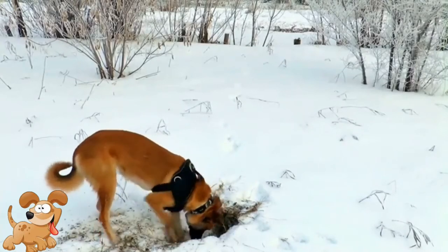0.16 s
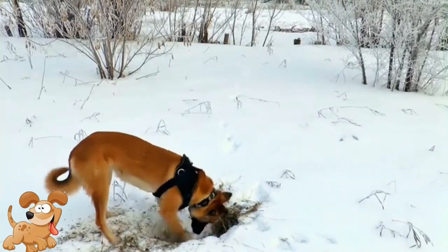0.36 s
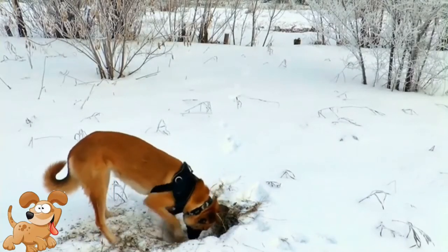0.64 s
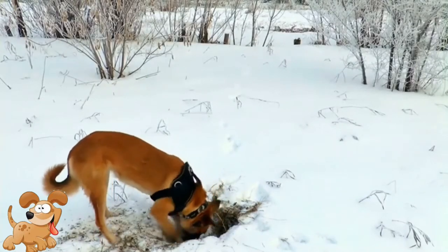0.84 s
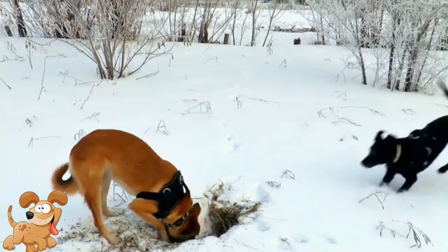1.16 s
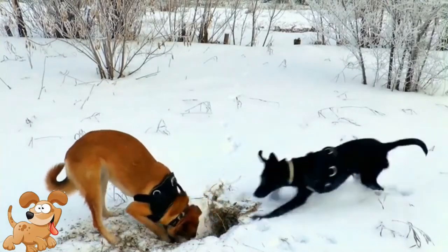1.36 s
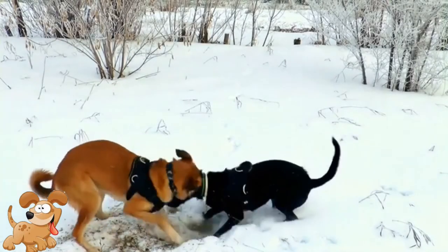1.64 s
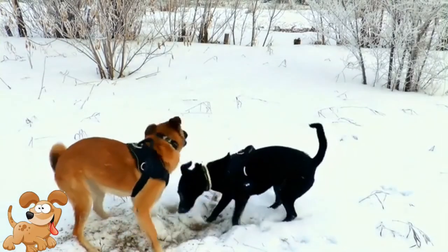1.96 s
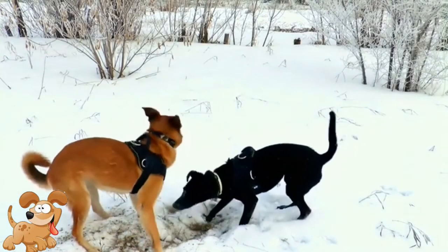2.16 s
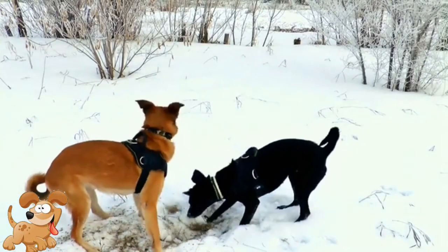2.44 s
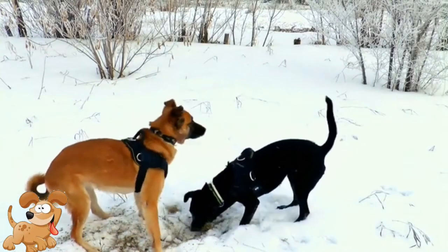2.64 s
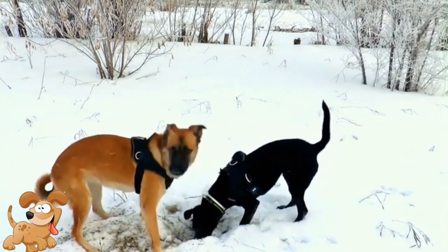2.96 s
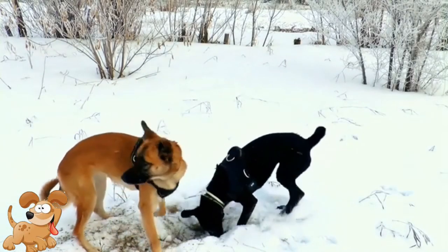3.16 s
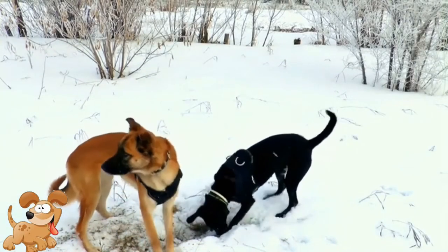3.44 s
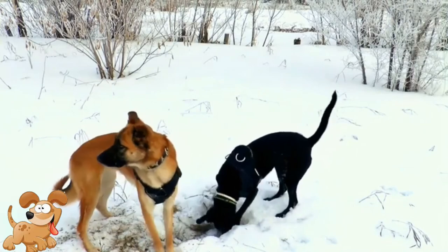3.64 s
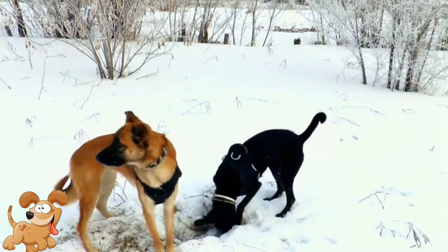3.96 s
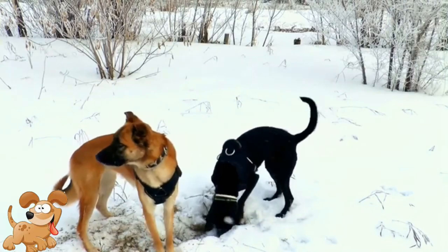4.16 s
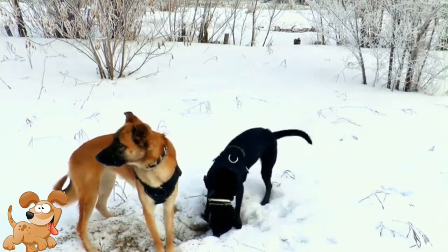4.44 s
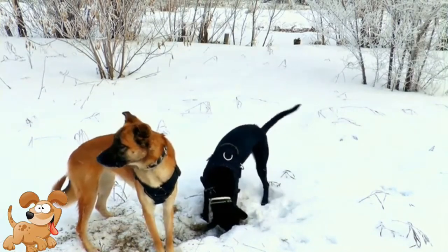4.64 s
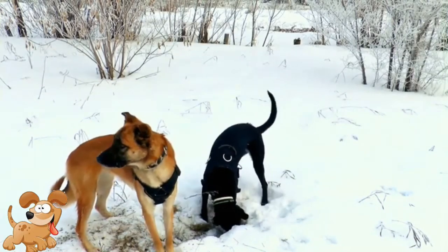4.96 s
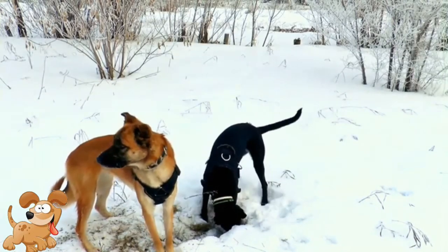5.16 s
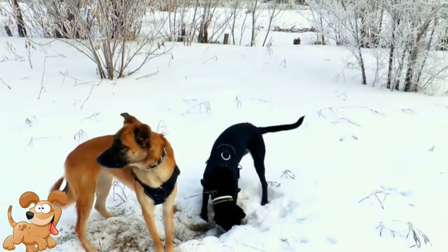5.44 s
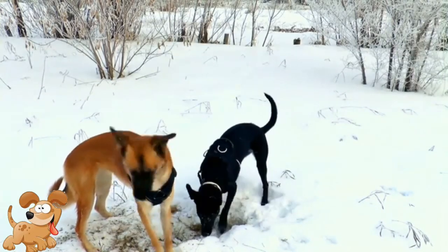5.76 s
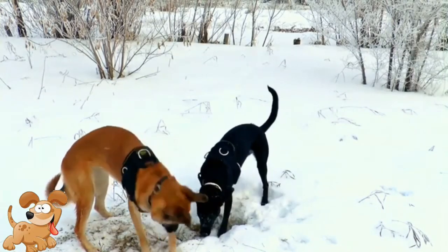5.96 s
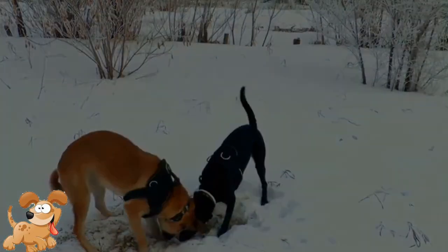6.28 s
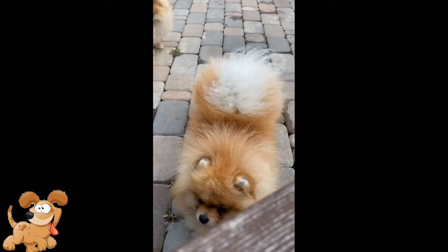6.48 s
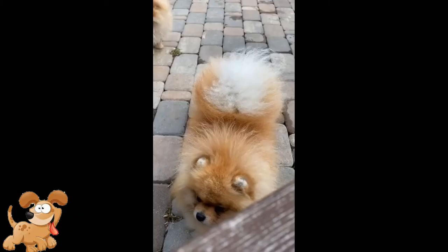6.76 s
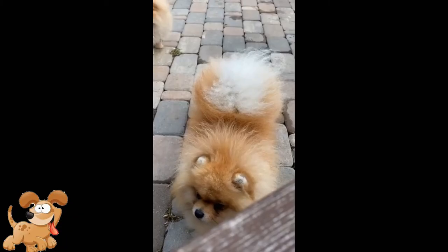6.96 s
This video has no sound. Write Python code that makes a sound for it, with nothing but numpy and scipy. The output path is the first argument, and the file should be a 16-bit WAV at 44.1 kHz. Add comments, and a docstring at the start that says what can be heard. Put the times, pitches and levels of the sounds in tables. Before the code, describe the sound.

Paws rake crunchy frozen snow in quick irregular bursts with snaps and knocks, then a dog snorts; silence, then faint claw clicks on paving.

```python
"""Paws rake crusted snow, knock on frozen soil and snap stalks as two dogs dig; soft pips, then one dog snorts.
A low outdoor rumble and thin hiss lie beneath. This fades, falls silent and cuts to a quiet paved yard
where a small dog's claws click over a hush and a soft rustle.
Raking is coloured random grains under force curves; snaps, knocks, flaps and claws are struck decaying modes;
air, hush and rustle are coloured noise; pips are swelling sines; the nose rasp is noise on gliding carriers."""
import sys
import numpy as np
from scipy import signal
from scipy.fft import rfft, irfft, next_fast_len
from scipy.io import wavfile
from scipy.ndimage import map_coordinates

SR = 44100
rng = np.random.default_rng(int(sys.argv[2]) if len(sys.argv) > 2 else 0)


def materialize(psi):
    """Save the field psi as 16-bit PCM at rate SR to the path in sys.argv[1].

    A 1-D psi becomes a single channel; in a 2-D psi each row is a channel.
    """
    bounded = np.clip(np.atleast_2d(psi).T, -1, 1)
    quanta = np.round(bounded * 32767).astype(np.int16)
    wavfile.write(sys.argv[1], SR, quanta)


N = 313551
TIME_S = np.arange(N) / SR
BIN_HZ = np.maximum(np.fft.rfftfreq(next_fast_len(N), 1 / SR), 1)
HIT_SAMPLES = SR // 6
SNOW_END_S, YARD_START_S = 6.453, 6.593
CUTOFF_HZ = 15800

# Spectra here and below: relative levels. Outdoor rumble. Each row: frequency in Hz, density in dB per Hz.
AIR_SPECTRUM = [(25, -19), (55, -1.5), (110, -4.5), (240, 2), (400, -4), (560, -13), (740, -11.5),
                (1000, -29), (1600, -28), (2600, -31.5), (3500, -37.5), (7000, -42), (15000, -44.5)]
# Outdoor stereo balance. Each row: frequency in Hz, left minus right in dB.
AIR_BALANCE_DB = [(60, 0.5), (110, -2.5), (200, -3.5), (380, -9.5), (700, -12), (1290, -11.5), (2380, -28),
                  (4400, -24), (8100, -3.5), (15000, -51.5)]
# Outdoor left-right likeness. Each row: frequency in Hz, likeness (1 = identical).
AIR_LIKENESS = [(60, 0.86), (130, 0.6), (290, 0.39), (640, 0.28), (1400, 0.1), (7000, 0.2)]
# Rumble level. Each row: time in seconds, level in dB.
AIR_LEVEL_DB = [(0, -37), (1.5, -38), (2.7, -37), (4.2, -37), (5.5, -38), (6.05, -38.5), (6.25, -42.5),
                (6.45, -54.5)]
# Thin hiss. Each row: frequency in Hz, density in dB per Hz.
HISS_SPECTRUM = [(1300, -18.5), (1650, -6), (1920, 2.5), (2250, -5.5), (2700, -1.5), (2950, -11),
                 (3150, -6), (3400, -16.5), (5000, -32.5)]
# Hiss swelling and fading. Each row: time in seconds, level in dB.
HISS_LEVEL_DB = [(0, -50), (1.1, -44.5), (2.4, -47), (2.85, -49.5), (4.1, -62.5), (4.55, -51), (5.2, -54),
                 (5.5, -69), (6.45, -66.5)]

# Snow crust. Each row: frequency in Hz, density in dB per Hz.
CRUST_SPECTRUM = [(700, -16), (1250, -17), (1600, -9.5), (1950, -1.5), (2400, 0), (2850, -1), (3170, -2.5),
                  (3700, -3), (4350, -7), (5500, -10.5), (8000, -26.5), (15000, -48)]
# Ice spray. Each row: frequency in Hz, density in dB per Hz.
ICE_SPECTRUM = [(2000, -12), (4000, 3), (5500, 0), (7200, 2), (8500, 1), (9700, 2), (11500, -4),
                (14300, -12.5), (16000, -41.5)]
# Packed snow. Each row: frequency in Hz, density in dB per Hz.
SOIL_SPECTRUM = [(70, -6), (150, -3), (380, 1.5), (560, -1.5), (800, -3), (1200, -2), (1450, 0), (2200, -8),
                 (4000, -45.5)]
# Stereo balance of the dig. Each row: frequency in Hz, left minus right in dB.
DIG_BALANCE_DB = [(60, 10), (110, 9), (200, -6.5), (380, -17.5), (700, -10), (1290, -6.5), (2380, -5.5),
                  (4400, -8), (9500, -2), (13000, -25)]
# Left-right likeness of the dig. Each row: frequency in Hz, likeness (1 = identical).
DIG_LIKENESS = [(100, 1), (500, 0.34), (1400, 0.87), (3100, 0.7), (7000, 0.63), (15000, 0.93)]
# Paw strokes. Each row: start in seconds, hardest push in seconds after start, length in seconds,
# force at that push in dB, iciness (spray over crunch) in dB.
STROKES = [(0.0, 0.0071, 0.064, -34, -5), (0.195, 0.022, 0.088, -34, 1.5), (0.397, .018, 0.015, -32.5, -5),
           (.44, 0.044, 0.086, -41.5, 4), (0.552, 0.053, 0.074, -28, 1), (0.677, 0.044, 0.051, -32.5, 13),
           (0.746, 0.036, 0.039, -28.5, 5), (0.806, 0.014, 0.026, -30.5, 1.5),
           (0.846, 0.047, 0.057, -27, 5.5), (0.924, 0.018, 0.038, -32.5, 5),
           (0.978, .015, 0.024, -36.5, 14.5), (1.168, 0.03, 0.079, -19.5, -4.5),
           (1.269, 0.011, 0.024, -19, 0), (1.301, 0.03, 0.053, -23.5, -4), (1.419, .005, 0.02, -26.5, 7),
           (1.45, 0.026, 0.048, -20.5, -4), (1.514, 0.037, 0.045, -24.5, 3),
           (1.568, 0.014, 0.042, -23.5, 1.5), (1.736, 0.017, 0.042, -29, 4.5),
           (1.787, .022, 0.029, -35, -7), (1.86, .015, 0.033, -66, -8), (1.972, 0.046, 0.085, -33.5, -3),
           (2.071, .014, 0.028, -32.5, -6), (2.176, .015, 0.026, -34.5, 2), (2.203, .016, 0.02, -28.5, 0),
           (2.964, .006, 0.012, -46, -16), (2.995, .006, .014, -49, -11), (3.036, 0.018, 0.023, -39, -10),
           (3.072, .005, .012, -42, 0), (3.154, .018, 0.036, -44, -11), (3.247, 0.034, 0.052, -30.5, 2.5),
           (3.306, 0.047, 0.1, -40, -9), (3.416, .012, 0.024, -40, 6), (3.452, 0.055, 0.081, -31, 1),
           (3.539, 0.025, 0.05, -40.5, -3), (3.671, .025, 0.032, -44.5, -15),
           (3.923, .008, 0.014, -51, -11), (3.99, .012, 0.036, -52, -7),
           (4.151, 0.0092, 0.0081, -36.5, -6.5), (4.252, 0.057, 0.058, -42, -1),
           (4.317, 0.018, 0.033, -39, -8), (4.385, 0.023, 0.023, -32.5, 2.5), (4.432, .008, 0.012, -27, -2),
           (4.594, 0.05, 0.088, -41.5, -5), (4.735, 0.014, 0.082, -55, -16),
           (4.865, 0.06, 0.074, -40.5, -3), (5.59, .006, 0.034, -31.5, -7.5),
           (5.618, 0.045, 0.081, -28, -10), (5.779, .025, 0.054, -39.5, -11),
           (5.851, .02, 0.052, -40.5, -7), (5.919, 0.0085, 0.043, -32.5, 11),
           (5.967, 0.037, 0.072, -44, -17), (6.059, .01, 0.011, -36, -8), (6.234, 0.019, 0.036, -44, -6),
           (6.294, 0.019, 0.1, -44.5, -4.5)]
# Snow crumbling between strokes. Each row: time in seconds, force in dB.
CRUMBLING_FORCE_DB = [(0.0, -42), (0.33, -40.5), (0.9, -42.5), (1.08, -47.5), (1.16, -39.5), (1.25, -39),
                      (1.38, -34.5), (1.55, -32), (1.65, -34), (1.8, -41.5), (1.93, -35.5), (2.13, -39.5),
                      (2.27, -46.5), (2.42, -53.5), (2.85, -55.5), (3.6, -43), (4.05, -55), (4.45, -47.5),
                      (4.55, -58), (4.7, -48), (5.05, -60), (5.55, -56), (5.75, -41.5), (5.9, -45.5),
                      (6.15, -46.5), (6.45, -61.5)]
CRUMBLING_ICINESS_DB, CRUMBLING_WAVER_DB, CRUMBLING_WAVER_HZ = -1.5, 2, 31
PRESS_DB_PER_S, EASE_DB_PER_S = 128, 85
CATCH_DB, CATCH_HZ = .6, 45  # claws catch and slip: all layers jerk together
CRACKLE_DB, CRACKLE_DB_PER_CRUNCH_DB = -21.5, 0.88
SOIL_DB, SOIL_DB_PER_FORCE_DB, SOIL_DB_PER_ICINESS_DB = -13, 0.98, -0.37

# Stalks and ice snapping. Each row: time in seconds, level in dB, pitch factor, brightness tilt in dB per octave.
SNAPS = [(.094, -25, 0.78, -7), (.1856, -23, 0.63, -2.5), (.2596, -7, 0.936, 0), (.378, -25, .74, -1),
         (.5403, -23, 0.76, -2), (.5993, -4, 0.98, 7.5), (.6022, -11, 0.85, -4), (.9121, -6, 0.99, -1),
         (1.1286, -25, 0.3, 1), (1.4272, -17.5, 0.67, 1), (1.8595, -37, .9, -2), (2.3143, -24, 0.84, -6),
         (2.975, -33, 0.88, -6), (3.08, -36, 0.9, 0), (3.2567, -25, 1.44, 0), (3.8529, -31, 1.05, -7),
         (3.9366, -37, 0.71, -4), (4.4386, -24, 0.58, -3), (4.7901, -29, 2.5, -1)]
# Stalk modes before pitch and tilt. Each row: frequency in Hz, relative level in dB, 60 dB decay in seconds.
STALK_MODES = [(2280, -5.5, 0.007), (2950, -1.5, 0.003), (3680, -0.5, 0.0075), (4280, -1.5, 0.0035),
               (7300, -6, 0.0036), (10170, -2, 0.0024)]
SPLINTERS_PER_S, SPLINTER_OVER_CRUMBLING_DB = 6.6, 14
SPLINTER_SPREAD_DB, SPLINTER_SPREAD_OCTAVES = 1.5, .4

# Paws on frozen soil. Each row: time in seconds, level in dB, pitch in Hz.
KNOCKS = [(0.5402, -19.5, 715), (0.553, -20.5, 527), (.5565, -26, 920), (0.735, -23, 620),
          (0.7417, -24, 418), (0.8272, -21, 553), (0.832, -31, 430), (1.1269, -27.5, 760),
          (1.198, -21.5, 378), (1.208, -11, 724), (1.215, -13.5, 376), (1.222, -18.5, 890),
          (1.232, -14.5, 437), (1.252, -19.5, 674), (1.318, -20.5, 533), (1.428, -21.5, 780),
          (1.6248, -19.5, 750), (1.858, -25, 560), (1.903, -39, 480), (1.921, -23, 560), (1.965, -23, 397),
          (2.024, -28, 250), (2.079, -25.5, 292)]
# Frozen clod modes. Each row: multiple of its pitch, relative level in dB, share of its ring time.
CLOD_MODES = [(.48, -5, 0.67), (1, -3.5, 1), (1.55, -9, .8), (2.8, -11, 0.64), (4.6, -17.5, .6)]
KNOCK_CYCLES = 7  # cycles for a full-share mode to lose 60 dB

# Pips as the dogs jostle nose to nose. Each row: time in seconds, level in dB, pitch in Hz, swell in seconds.
PIPS = [(1.8695, -27.5, 1990, 0.0024), (1.921, -30, 705, 0.002), (1.964, -24.5, 680, .0025),
        (1.964, -32, 1980, .002), (1.9765, -27.5, 690, 0.0052), (1.98, -42, 1080, .003)]

# Nostrils flapping open. Each row: time in seconds, thump in dB, nasal ring in dB (before a common trim),
# pitch factor of the ring, puff of air in dB.
FLAPS = [(5.6354, -8, -28, 0.83, -34), (5.6425, -18, -33.5, 0.65, -39), (5.6549, -9, -9.5, 0.9, -26.5),
         (5.6792, -8.5, -8.5, .97, -26), (5.7092, -19, -7.5, 0.99, -34)]
# Chest modes before pitch. Each row: frequency in Hz, relative level in dB, 60 dB decay in seconds.
CHEST_MODES = [(128.7, -6, 0.052), (308, 6, 0.01), (467, 1.5, 0.023)]
# Muzzle modes before pitch. Each row: frequency in Hz, relative level in dB, 60 dB decay in seconds.
MUZZLE_MODES = [(620, -4.5, 0.006), (913, 1.5, 0.013), (1080, -8, 0.018), (1500, -12.5, 0.0083),
                (2130, -8.5, 0.017), (4020, -7.5, 0.0093)]
# Puffs. Each row: frequency in Hz, density in dB per Hz.
PUFF_SPECTRUM = [(300, 0.5), (1000, -4.5), (1700, -6), (2600, -19), (4500, -2), (9000, -10), (14000, -36.5)]
PUFF_FALL_S = 0.0044
# Rushing air, before a trim. Each row: time in seconds, level in dB.
SNORT_AIR_DB = [(5.62, -49), (5.654, -40), (5.665, -37), (5.6685, -20.5), (5.677, -28.5), (5.686, -29),
                (5.692, -15), (5.697, -27.5), (5.706, -30), (5.725, -36.5), (5.745, -51)]
# Rushing air. Each row: frequency in Hz, density in dB per Hz.
NOSTRIL_SPECTRUM = [(500, -1), (950, 6.5), (1400, 11), (1700, 5), (2300, 13.5), (2750, 11), (3200, -20),
                    (4200, 5), (6000, -37)]
# Resonance of the narrowing nose. Each row: time in seconds, frequency in Hz, level in dB.
NOSE_GLIDE = [(5.678, 880, -38), (5.684, 964, -27), (5.692, 1170, -26.5), (5.697, 1290, -30.5),
              (5.706, 1280, -46.5)]
NOSE_WIDTH_HZ, NOSE_UPPER_RATIO, NOSE_UPPER_DB = 180, 1.9, -0.5

# Yard hush. Each row: frequency in Hz, density in dB per Hz.
YARD_SPECTRUM = [(25, -19.5), (80, -7), (160, -18), (350, -22), (700, -25.5), (1300, -36), (1900, -47),
                 (3000, -58.5), (6000, -58), (10000, -78)]
# Left-right likeness of the yard. Each row: frequency in Hz, likeness (1 = identical).
YARD_LIKENESS = [(60, 0.93), (290, 0.86), (640, 0.56), (1400, 0.067), (3000, 0.11)]
# Stereo balance of the yard. Each row: frequency in Hz, left minus right in dB.
YARD_BALANCE_DB = [(100, -1.2), (1000, -1.4)]
# Soft rustle swelling between the claw ticks. Each row: time in seconds, level in dB.
RUSTLE_LEVEL_DB = [(6.6, -76), (6.64, -69), (6.69, -63), (6.75, -60.5), (6.81, -66), (6.85, -68),
                   (6.89, -79), (6.94, -59.5), (6.99, -71), (7.04, -63), (7.11, -76)]
# Rustle. Each row: frequency in Hz, density in dB per Hz.
RUSTLE_SPECTRUM = [(600, -5.5), (1100, 4), (1500, 5), (2000, -3), (2600, -11), (3200, -8), (4000, -22),
                   (6300, -29), (8000, -33)]
# Claws on paving. Each row: time in seconds, level in dB (before a common trim), pitch factor.
CLAWS = [(6.669, -63.5, 1.14), (6.7, -49.5, 0.97), (6.743, -52, 1.2), (6.784, -26, 1.01), (6.904, -59, 1.4),
         (6.93, -57, 0.74), (6.9478, -30.5, 1), (6.951, -41, 0.94), (6.961, -49, 1.2), (7.015, -49, 1),
         (7.032, -22, 1.023), (7.039, -38, 1.1), (7.052, -41, 1.07)]
# Claw modes before pitch. Each row: frequency in Hz, relative level in dB, 60 dB decay in seconds.
CLAW_MODES = [(374, -14.5, 0.035), (840, -6, 0.019), (1110, -4.5, 0.012), (1330, -9.5, 0.012),
              (2120, -4, 0.035), (2475, 0.5, 0.014), (3150, -8, 0.0049), (4000, -9.5, 0.0034),
              (6150, -6.5, 0.0072), (12600, -28, 0.0067)]


def from_db(db):
    """Decibels to gain."""
    return 10 ** (np.asarray(db) / 20)


def rms_one(x):
    """Scale to an rms of 1."""
    return x / np.sqrt(np.mean(x ** 2) + 1e-20)


def peak_one(x):
    """Scale to a peak of 1."""
    return x / (np.abs(x).max() + 1e-20)


def gain_curve(rows):
    """Rows of (s, dB) as a gain in time, silent outside them."""
    s, db = np.transpose(rows)
    return from_db(np.interp(TIME_S, s, db)) * (TIME_S >= s[0]) * (TIME_S <= s[-1])


def over_hz(points):
    """Points joined on a log-frequency axis."""
    hz, value = np.transpose(points)
    return np.interp(np.log(BIN_HZ), np.log(hz), value)


def pan(left_minus_right_db):
    """Left and right gains for a level difference; their mean is 1."""
    gains = from_db(np.array([[.5], [-.5]]) * left_minus_right_db)
    return gains / gains.mean(axis=0)


def drift(rate_hz):
    """Lowpassed noise with an rms of 1."""
    spectrum = rfft(rng.standard_normal(next_fast_len(N)))
    return rms_one(irfft(spectrum / (1 + (BIN_HZ / rate_hz) ** 2))[:N])


def white():
    """Two unrelated noises."""
    return rng.standard_normal((2, N))


def colour(pair, spectrum, likeness, balance_db):
    """Two unrelated excitations become one stereo sound with a given spectrum; mid level 1."""
    mid, side = rfft(pair, next_fast_len(N))
    alike = np.clip(over_hz(likeness), -1, 1)
    both = np.sqrt(1 + alike) * mid + np.sqrt(1 - alike) * side * [[1], [-1]]
    shaped = both * from_db(over_hz(spectrum)) * pan(over_hz(balance_db))
    out = irfft(shaped)[:, :N]
    return out / np.std(out.mean(axis=0))


def shifting(sound, ripple_db, width_hz, patch_s):
    """Broad random resonances change over time, partly shared by the two sides."""
    hz, s, frames = signal.stft(sound, SR, nperseg=512)
    shared, left, right = rng.standard_normal((3, 150, 60))
    grid = np.meshgrid(hz / width_hz, s / patch_s, indexing="ij")
    ripple = np.array([map_coordinates(shared + own / 2, grid, order=1, mode="wrap")
                       for own in (left, right)])
    return signal.istft(frames * rms_one(from_db(ripple_db * ripple)), SR)[1][:, :sound.shape[1]]


def strike(modes, pitch, grit, grit_s):
    """Modes rung by an impulse plus a decaying noise tail, as a contact crumbles after landing."""
    t = TIME_S[:HIT_SAMPLES]
    force = grit * rng.standard_normal(len(t)) * np.exp(-t / grit_s)
    force[0] = 1
    ring = np.zeros(len(t))
    for k, (hz, db, t60) in enumerate(modes):
        mode = from_db(db - 60 * t / t60) * np.sin(2 * np.pi * min(hz * pitch, CUTOFF_HZ) * t)
        ring += (-1) ** k * mode
    return signal.fftconvolve(force, ring)[:len(t)]


def place(hits):
    """Lay (s, dB, sound) hits on the time line."""
    out = np.zeros(N + SR)
    for s, db, sound in hits:
        at = int(s * SR)
        out[at:at + len(sound)] += from_db(db) * sound
    return out[:N]


def open_air():
    """A gently wavering noise rumble, with a thin, restless hiss on the right."""
    waver = from_db(1.54 * drift(9.5))
    rumble = gain_curve(AIR_LEVEL_DB) * colour(white(), AIR_SPECTRUM, AIR_LIKENESS, AIR_BALANCE_DB) * waver
    hiss = colour(white(), HISS_SPECTRUM, AIR_LIKENESS, AIR_BALANCE_DB)
    hiss = shifting(hiss, ripple_db=4.0, width_hz=210, patch_s=0.08)
    return rumble + gain_curve(HISS_LEVEL_DB) * hiss


def grains(per_s, spread_db, clump_db, clump_hz):
    """Tiny fractures of uneven size, their level wavering in clumps as the claws catch and slip."""
    born = rng.random(N) < per_s / SR
    sizes = from_db(spread_db * np.minimum(rng.exponential(1, N), 4))
    return white() * born * sizes * from_db(clump_db * drift(clump_hz))


def pressure(t, push_s, length_s, rise_s, fall_s):
    """A paw bites in, bears down to its hardest push, eases as it draws back, and trails off in crumbs."""
    bite = .5 + .5 * np.tanh(t / rise_s - .5)
    crumbs = np.exp(-np.maximum(t - length_s, 0) / fall_s)
    push_db = np.minimum(PRESS_DB_PER_S * (t - push_s), EASE_DB_PER_S * (push_s - t))
    return bite * crumbs * from_db(push_db)


def debris(layers, force_db, iciness_db):
    """Force raises crunch, crackle, spray and soil together; icy ground trades crunch and soil for spray."""
    crunch, crackle, ice, soil = layers
    crunch_db = force_db - iciness_db / 2
    crackle_db = CRACKLE_DB + CRACKLE_DB_PER_CRUNCH_DB * crunch_db
    ice_db = force_db + iciness_db / 2
    soil_db = SOIL_DB + SOIL_DB_PER_FORCE_DB * force_db + SOIL_DB_PER_ICINESS_DB * iciness_db
    return (from_db(crunch_db) * crunch + from_db(crackle_db) * crackle
            + from_db(ice_db) * ice + from_db(soil_db) * soil)


def crumbling_db(s):
    """How much loose snow is on the move at these times."""
    return np.interp(s, *np.transpose(CRUMBLING_FORCE_DB))


def raking():
    """Crust crunches and crackles, fine ice sprays off, packed snow breaks in coarse dull grains."""
    def layer(fractures, spectrum):
        return colour(fractures, spectrum, DIG_LIKENESS, DIG_BALANCE_DB)
    crunch = from_db(-5.5) * layer(grains(6500, spread_db=0.0, clump_db=0.06, clump_hz=130), CRUST_SPECTRUM)
    crackle = layer(grains(420, spread_db=-1.0, clump_db=1.5, clump_hz=30), CRUST_SPECTRUM)
    ice = from_db(-6.0) * layer(grains(22000, spread_db=0.5, clump_db=0.2, clump_hz=44), ICE_SPECTRUM)
    soil = layer(grains(1800, spread_db=0.0, clump_db=2.0, clump_hz=26), SOIL_SPECTRUM)
    layers = np.array([crunch, crackle, ice, soil]) * from_db(CATCH_DB * drift(CATCH_HZ))
    waver = from_db(CRUMBLING_WAVER_DB * drift(CRUMBLING_WAVER_HZ))
    out = waver * debris(layers, crumbling_db(TIME_S), CRUMBLING_ICINESS_DB)
    for start_s, push_s, length_s, force_db, iciness_db in STROKES:
        at = max(int(start_s * SR) - SR // 20, 0)  # the bite begins softly before the start
        span = slice(at, at + SR // 3)
        force = pressure(TIME_S[span] - start_s, push_s, length_s, rise_s=0.0062, fall_s=0.013)
        ground = debris(layers[:, :, span], force_db, iciness_db)
        out[:, span] += force * shifting(ground, ripple_db=3.5, width_hz=150, patch_s=.028)
    return out


def splinters():
    """Small random snaps, louder where more snow moves: rows of (s, dB, pitch factor, brightness)."""
    when, size, pitch = rng.random((int(SPLINTERS_PER_S * SNOW_END_S), 3)).T
    s = when * SNOW_END_S
    db = crumbling_db(s) + SPLINTER_OVER_CRUMBLING_DB + SPLINTER_SPREAD_DB * (2 * size - 1)
    pitch_factor = 2 ** (SPLINTER_SPREAD_OCTAVES * (2 * pitch - 1))
    return list(zip(s, db, pitch_factor, np.zeros(len(s))))


def snaps():
    """Brittle stalks give way over a few gritty milliseconds; tilt sets how bright each rings."""
    hits = []
    for s, db, pitch, tilt_db in list(SNAPS) + splinters():
        modes = [(hz, mode_db + tilt_db * np.log2(hz), t60)
                 for hz, mode_db, t60 in STALK_MODES if hz * pitch < CUTOFF_HZ]
        hits.append((s, db, peak_one(strike(modes, pitch, grit=0.16, grit_s=0.0022))))
    return pan(-12.0) * place(hits)


def knocks():
    """A paw lands on a frozen clod: one damped note, a dull thud below it and weak overtones."""
    hits = []
    for s, db, hz in KNOCKS:
        modes = [(hz * multiple, mode_db, share * KNOCK_CYCLES / hz)
                 for multiple, mode_db, share in CLOD_MODES]
        hits.append((s, db, peak_one(strike(modes, 1, grit=0.089, grit_s=0.009))))
    return pan(-13.0) * place(hits)


def pips():
    """Nearly pure notes that swell for a few milliseconds and die away."""
    t = TIME_S[:HIT_SAMPLES]
    hits = []
    for s, db, hz, swell_s in PIPS:
        swell = peak_one(t * np.exp(-t / swell_s))
        hits.append((s, db, swell * np.sin(2 * np.pi * hz * t)))
    return pan(-8.0) * place(hits)


def rasp():
    """Two resonances of the nose, blown by turbulent air, glide up together as it narrows."""
    s, hz, db = np.transpose(NOSE_GLIDE)
    phase = 2 * np.pi * np.cumsum(np.interp(TIME_S, s, hz)) / SR

    def resonance(ratio):
        return drift(NOSE_WIDTH_HZ) * np.cos(ratio * phase) + drift(NOSE_WIDTH_HZ) * np.sin(ratio * phase)
    both = resonance(1) + from_db(NOSE_UPPER_DB) * resonance(NOSE_UPPER_RATIO)
    return pan(-5.5) * gain_curve(list(zip(s, db))) * both


def snort():
    """Each nostril flap thumps, rings the muzzle and lets out a puff; air rushes on between flaps."""
    thump_hits, ring_hits, puff_hits = [], [], []
    for s, thump_db, ring_db, pitch, puff_db in FLAPS:
        thump_hits.append((s, thump_db, strike(CHEST_MODES, 0.88, grit=0.013, grit_s=0.0016)))
        ring_hits.append((s, ring_db, peak_one(strike(MUZZLE_MODES, pitch, grit=0.098, grit_s=0.00415))))
        puff_hits.append((s, puff_db, np.exp(-TIME_S[:HIT_SAMPLES] / PUFF_FALL_S)))
    thumps = pan(-10.5) * place(thump_hits)
    rings = from_db(-4.5) * pan(-4.0) * place(ring_hits)
    puffs = place(puff_hits) * colour(white(), PUFF_SPECTRUM, DIG_LIKENESS, DIG_BALANCE_DB)
    rush = colour(white(), NOSTRIL_SPECTRUM, DIG_LIKENESS, DIG_BALANCE_DB)
    air = from_db(-2.5) * gain_curve(SNORT_AIR_DB) * rush
    return thumps + rings + puffs + air + rasp()


def claw_ticks():
    """Claws ring in short modes on stone, with separate contact grit for each side."""
    def one_side():
        return place((s, db, peak_one(strike(CLAW_MODES, pitch, grit=0.12, grit_s=0.0041)))
                     for s, db, pitch in CLAWS)
    ticks = np.array([one_side(), one_side()])
    ticks[1] = np.roll(ticks[1], SR // 9000)  # the right side hears them a little later
    return from_db(-1.5) * pan(2.6) * ticks


def yard():
    """Claw ticks over a low noise hush and a swelling rustle, both with shifting resonances."""
    hush = from_db(-53.5) * colour(white(), YARD_SPECTRUM, YARD_LIKENESS, YARD_BALANCE_DB)
    rustle = colour(white(), RUSTLE_SPECTRUM, YARD_LIKENESS, YARD_BALANCE_DB)
    bed = hush + gain_curve(RUSTLE_LEVEL_DB) * rustle
    return claw_ticks() + shifting(bed, ripple_db=4.5, width_hz=221, patch_s=0.037)


def scene():
    """The snow field, a short silence, then the yard."""
    snow = open_air() + raking() + snaps() + knocks() + pips() + snort()
    return snow * (TIME_S < SNOW_END_S) + yard() * (TIME_S > YARD_START_S)


def record(dry):
    """Clip at full scale, then lowpass steeply."""
    lowpass = signal.ellip(10, .1, 80, CUTOFF_HZ, fs=SR, output="sos")
    return signal.sosfilt(lowpass, np.clip(dry, -1, 1))


dry = scene()
out = record(dry)
materialize(out)
```